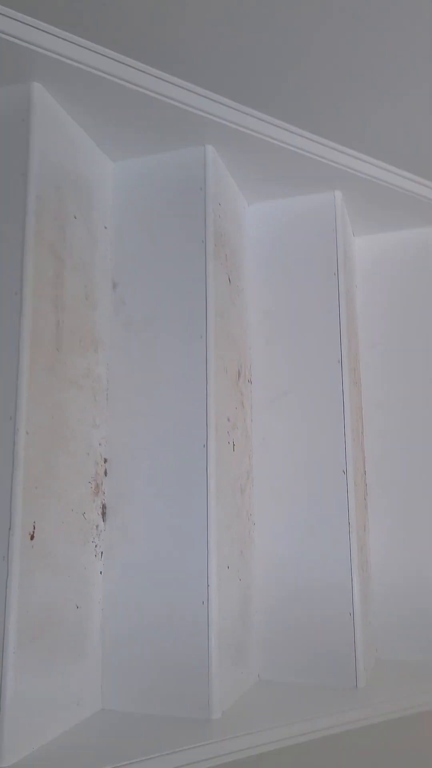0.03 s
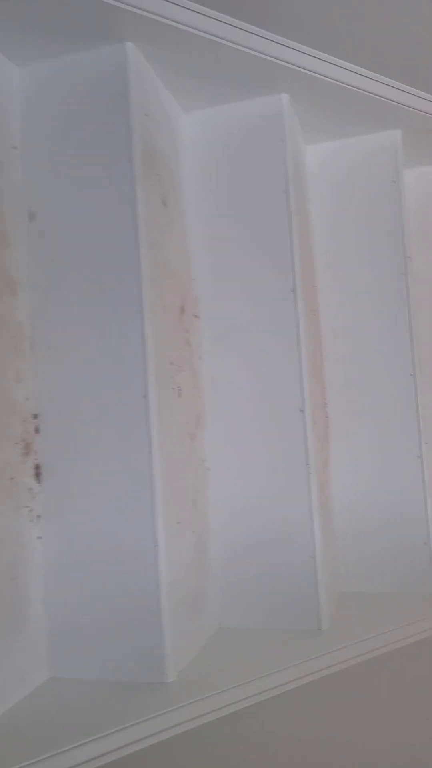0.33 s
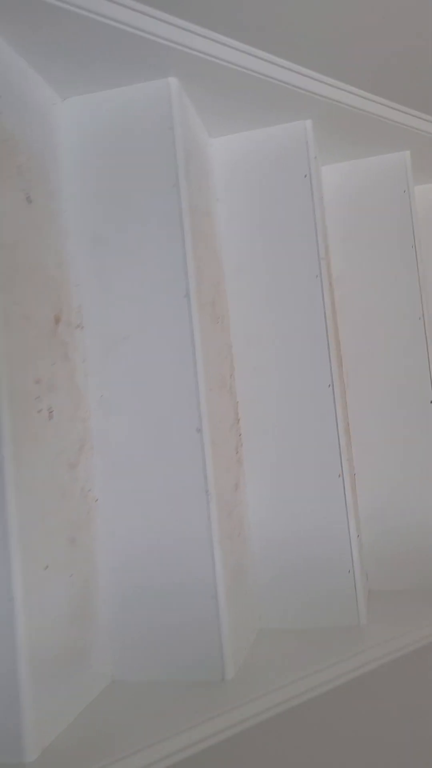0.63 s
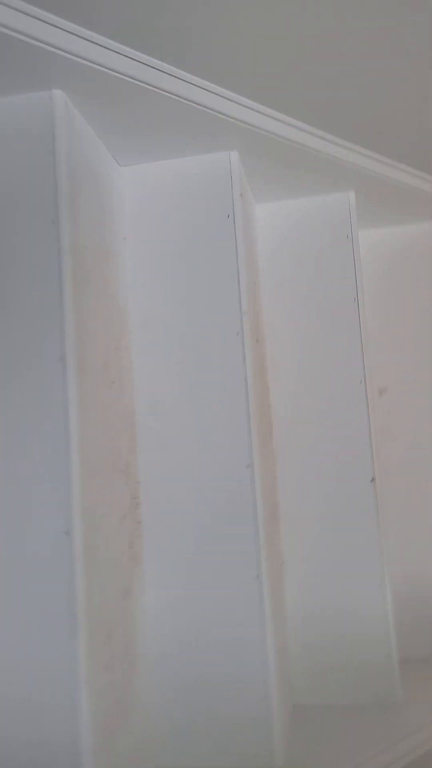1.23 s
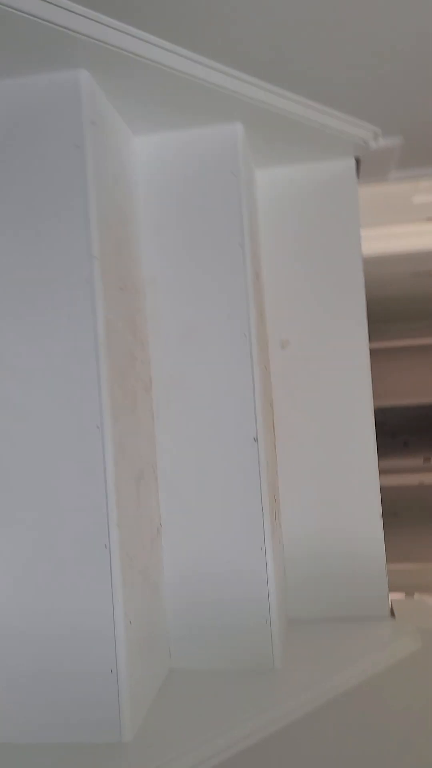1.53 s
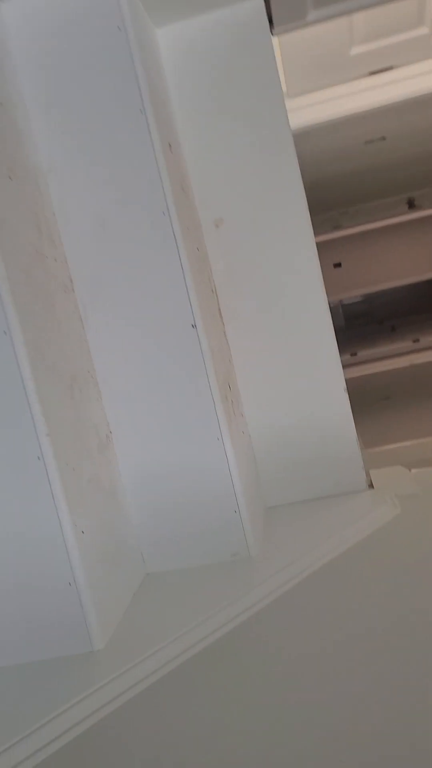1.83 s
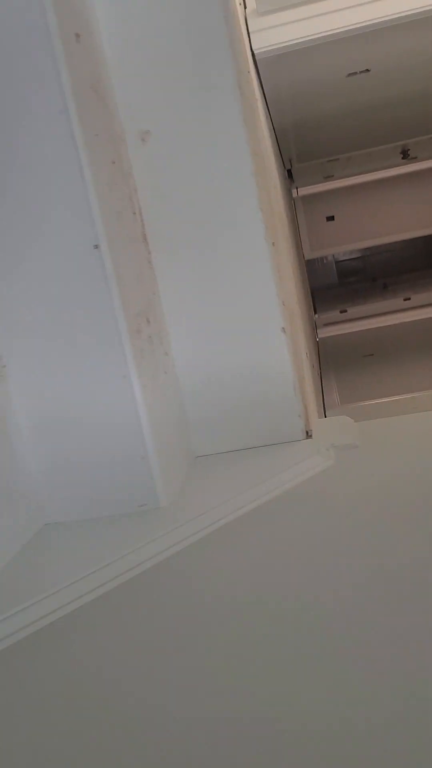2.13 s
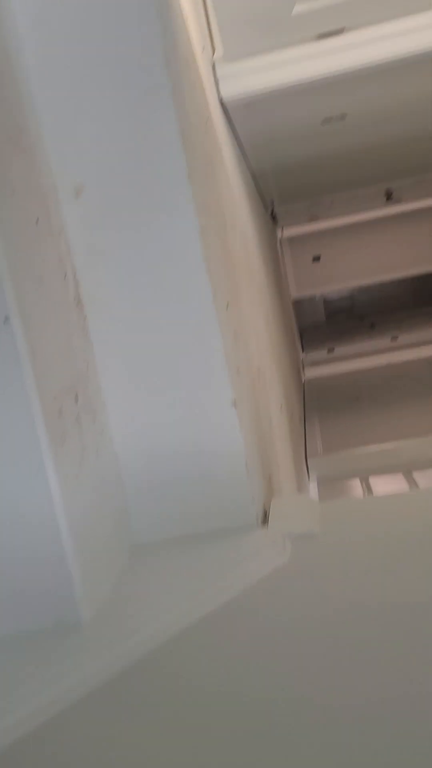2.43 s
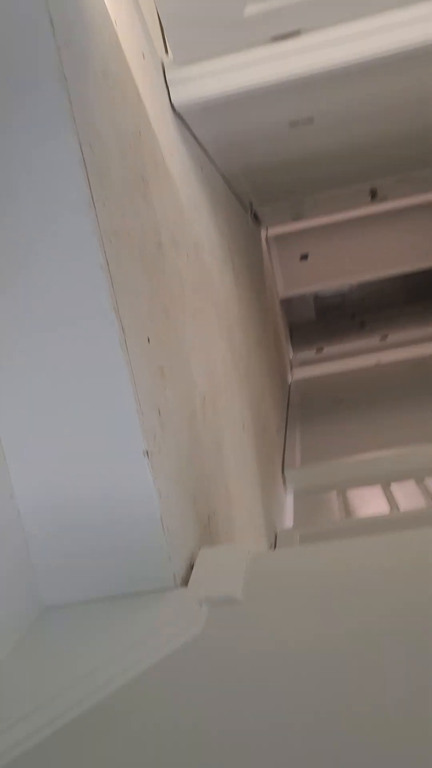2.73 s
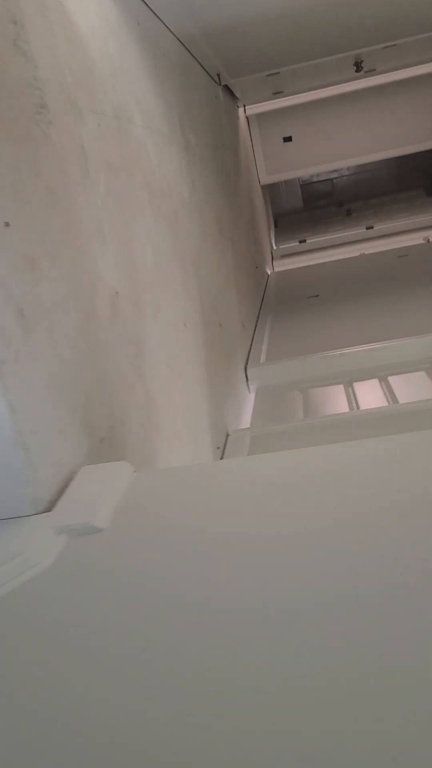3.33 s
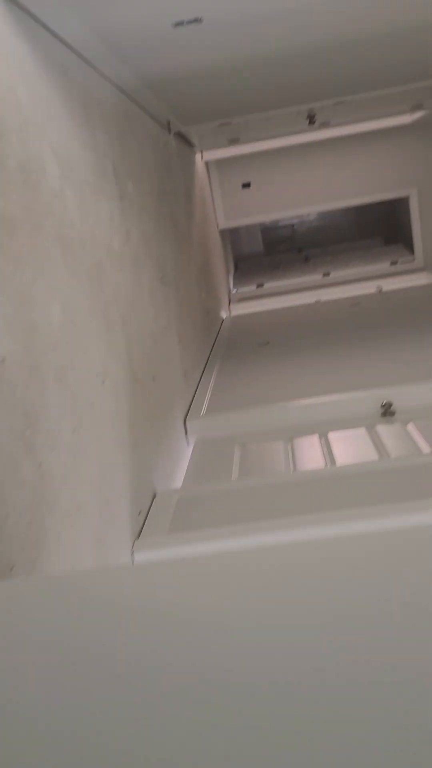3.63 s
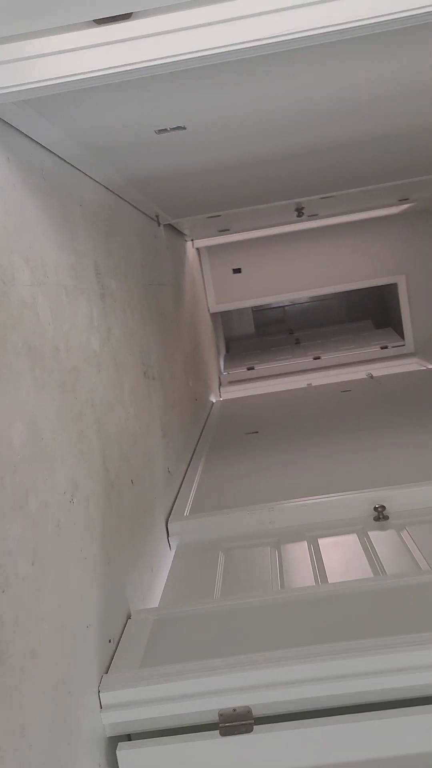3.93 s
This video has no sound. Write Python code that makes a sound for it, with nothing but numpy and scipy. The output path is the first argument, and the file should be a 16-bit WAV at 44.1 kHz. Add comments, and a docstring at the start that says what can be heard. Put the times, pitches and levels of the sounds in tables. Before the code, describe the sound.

Heard close from a phone in the walker's hand, six footsteps descend wooden stairs, starting soft and growing heavier. Light scuffs, dry ticks and a faint metal jingle fall between them, with bare walls echoing over quiet room noise.

```python
"""Footsteps going down a wooden staircase in an empty house, heard from a phone in the walker's hand.
Heel and sole strike each tread: the board thuds, the hollow flight booms, the shoe slaps and grinds on grit.
Between steps soles scuff, joints tick and a small piece of metal jingles.
The phone's two microphones hear all this close by, with bare walls ringing over quiet room noise."""
import sys
import numpy as np
from scipy import signal
from scipy.fft import rfft, irfft
from scipy.io import wavfile
from scipy.ndimage import map_coordinates

SR = 44100
rng = np.random.default_rng(int(sys.argv[2]) if len(sys.argv) > 2 else 0)


def wav_out(sig):
    """Save sig, one row per channel (or a flat mono array), as 16-bit PCM at SR to the path in sys.argv[1]."""
    wavfile.write(sys.argv[1], SR, np.round(np.clip(np.atleast_2d(sig).T, -1, 1) * 32767).astype(np.int16))


N = 176400
CONTACT_RISE_S = 0.00022


def undb(db):
    return 10 ** (np.asarray(db) / 20)


def clock():
    return np.arange(N) / SR


def bins():
    return np.arange(N // 2 + 1) * SR / N


def curve(points, hz):
    """Straight lines between points on a log-frequency axis."""
    freqs, values = np.array(points, float).T
    return np.interp(np.log(np.maximum(hz, 1)), np.log(freqs), values)


def conv(x, impulse):
    return signal.fftconvolve(x, impulse)[:N]


def colour(x, points):
    """Causal filter of the given colour that keeps the power of white noise."""
    cepstrum = irfft(np.log(undb(curve(points, bins()))))
    cepstrum[1:N // 2] *= 2  # fold to minimum phase
    cepstrum[N // 2 + 1:] = 0
    impulse = irfft(np.exp(rfft(cepstrum)))[:8192]
    return conv(x, impulse / np.linalg.norm(impulse))


def resonate(x, hz, width_hz):
    """One narrow resonance that keeps the power of white noise."""
    t = clock()[:4096]
    impulse = np.sin(2 * np.pi * hz * t) * np.exp(-np.pi * width_hz * t)
    return conv(x, impulse / np.linalg.norm(impulse))


def ring(modes, start_s, scale=1):
    """Decaying modes struck at one moment."""
    first = min(max(int(start_s * SR), 0), N - 1)
    t = np.maximum(clock() - start_s, 0)[first:first + SR, None]
    hz, db, t60 = np.array(modes, float).T
    decay = np.exp(-np.log(1000) * t / t60)
    out = np.zeros(N)
    out[first:first + SR] = (undb(db) * np.sin(2 * np.pi * hz * scale * t) * decay).sum(axis=1)
    return out


def burst(start_s, rise_s, fall_s):
    """Quick attack, exponential release."""
    t = np.maximum(clock() - start_s, 0)
    return (1 - np.exp(-t / rise_s)) * np.exp(-np.minimum(t / fall_s, 50))


def grains(spread_db):
    """Noise broken into tiny contacts of uneven size; the spread is capped at 4 dB."""
    sizes = undb(np.clip(spread_db, 0, 4) * rng.standard_normal(N // 20 + 1))
    noise = rng.standard_normal(N) * np.repeat(sizes, 20)[:N]
    return noise / noise.std()


# Stereo width of the room at the microphones: freq_hz, side_over_mid_db
ROOM_WIDTH = [(70, -2.5), (130, -16.5), (260, -4.5), (500, 0), (1000, 5.5), (2200, 1), (15000, -1)]
def spread(mid, side):
    """Left and right from two unrelated sounds; the bass is mostly shared."""
    width = undb(curve(ROOM_WIDTH, bins()))
    shared = rfft(mid) / np.hypot(1, width)
    opposed = rfft(side) * width / np.hypot(1, width)
    return irfft(np.array([shared + opposed, shared - opposed]))


# Room tone of the empty house: freq_hz, level_db
AIR_COLOUR = [(20, -16), (40, -2.5), (68, -3), (105, -16), (170, -24), (400, -18.5), (950, -26),
              (1600, -24), (3000, -31), (4600, -29.5), (7000, -34), (9000, -45), (15500, -44.5)]
def still_air():
    """Quiet, steady noise all around the microphones, mostly low rumble."""
    gain = undb(curve(AIR_COLOUR, bins()))
    mid, side = irfft(rfft(rng.standard_normal((2, N))) * gain)
    air = spread(mid, side)
    return undb(-52) * air / air.std()


# Decay of the stairwell: freq_hz, t60_s
WALL_DECAY = [(70, 0.56), (160, 0.12), (450, 1.0546), (1500, 0.35), (4500, 0.53), (9000, 0.61),
              (15000, 0.26)]
# Strength of its echo at the phone: freq_hz, level_db
WALL_COLOUR = [(60, -16.5), (150, -2), (400, -2.5), (1500, 6), (5000, 3.5), (14000, 2.5)]
def stairwell(x):
    """Dense echoes from bare walls, each octave with its own decay."""
    octaves_hz = 62.5 * 2 ** np.arange(9)
    noise = rfft(rng.standard_normal((2, N)))
    tail = np.zeros((2, N))
    for hz, weights in zip(octaves_hz, np.eye(9)):
        band = curve(list(zip(octaves_hz, weights)), bins())
        shape = burst(0.00084, rise_s=0.00043, fall_s=curve(WALL_DECAY, hz) / np.log(1000))
        tail += irfft(noise * band) * shape / np.linalg.norm(shape) * undb(curve(WALL_COLOUR, hz))
    return np.array([conv(x, impulse) for impulse in spread(*tail)])


def moving_echoes(x, change_hz=14):
    """Walker and phone keep moving, so the pattern of echoes keeps changing."""
    turn = 2 * np.pi * change_hz * clock()
    return stairwell(x * np.cos(turn)) + stairwell(x * np.sin(turn))


def squeak(peak_s=0.2235, pitch_hz=5650, width_s=0.0011):
    """One tiny high squeak close to the phone, too near to stir the room."""
    t = clock() - peak_s
    return undb(-35) * np.exp(-(t / width_s) ** 2) * np.sin(2 * np.pi * pitch_hz * t)


# Ticks on the staircase: start_s, level_db
WOOD_TICKS = [(0.335, -37), (0.883, -36), (1.248, -27.5), (2.028, -30), (2.227, -38), (3.142, -46)]
# Colour of a tick: freq_hz, level_db
TICK_COLOUR = [(300, -6), (1500, 0), (5000, -3), (8000, -8), (16000, -16)]
def ticks():
    """Wood and grit give lone dry ticks."""
    shape = sum(undb(db) * burst(start_s, rise_s=0.00054, fall_s=0.0015) for start_s, db in WOOD_TICKS)
    return colour(shape * rng.standard_normal(N), TICK_COLOUR)


# Colour of the crunch underfoot, and of the metal's first touch: freq_hz, level_db
BRIGHT_COLOUR = [(2500, -18), (4300, -1), (5100, 5), (5400, 7), (5750, -3), (6050, 7), (6500, 7),
                 (7700, -0.5), (11000, 0.5), (14000, -6), (16000, -3.5)]
def crunch(start_s=0.514, length_s=0.012):
    """A short run of bright cracks under a shoe stops and leaves a thin ring."""
    t = np.maximum(clock() - start_s, 0)
    shape = np.minimum(t / 0.001, 1) * np.exp(-np.minimum((t / length_s) ** 2, 50))
    fading_noise = burst(start_s, CONTACT_RISE_S, fall_s=0.2253) * rng.standard_normal(N)
    tail = resonate(fading_noise, hz=5350, width_hz=170)
    cracks = colour(shape * grains(spread_db=1), BRIGHT_COLOUR)
    return undb(-30) * cracks + undb(-50.5) * tail


# Jolts of the metal piece: start_s, ring_db, rattle_db
METAL_JOLTS = [(1.527, -46, -44), (2.186, -58, -68), (2.80, -65, -59), (3.33, -63, -49.5),
               (3.375, -76, -52)]
# Its modes: pitch_hz, level_db, t60_s
METAL_MODES = [(13494, -2, 0.22), (13551, 0, 0.3), (13630, -1, 0.16)]
def jingles():
    """A small metal piece, jogged by the walk, clinks once, rattles briefly and rings on."""
    pings, rattle = np.zeros((2, N))
    for start_s, ring_db, rattle_db in METAL_JOLTS:
        pings += undb(ring_db) * ring(METAL_MODES, start_s)
        rattle += undb(rattle_db) * burst(start_s, rise_s=0.0028, fall_s=0.023)
    first_touch = burst(1.511, CONTACT_RISE_S, fall_s=0.002) * rng.standard_normal(N)
    clink = undb(-31.5) * colour(first_touch, BRIGHT_COLOUR)
    return pings + clink + resonate(rattle * grains(spread_db=2), hz=11000, width_hz=1000)


# Soles sliding and lifting below the phone: peak_s, rise_s, fall_s, rub_db, hiss_db
SLIDES = [(0.005, 0.026, 0.022, -44.5, -51.5), (0.074, 0.029, 0.018, -55, -50),
          (0.62, 0.16, 0.13, -51, -62), (1.413, 0.1, 0.093, -49.5, -55.5), (1.94, 0.021, 0.035, -45.5, -72),
          (2.10, 0.16, 0.055, -47.5, -55), (2.762, 0.082, 0.052, -48.5, -54),
          (3.44, 0.14, 0.06, -52.5, -57.5)]
# Colours of the rub and of the hiss: freq_hz, level_db
RUB_COLOUR = [(80, -2), (250, 4), (480, 7.5), (900, -2), (1450, 3.5), (2500, -4), (4500, -4), (7000, -29),
              (8500, -28), (16000, -35)]
HISS_COLOUR = [(1500, -8), (4000, -8), (6500, 5), (8500, -1.5), (16000, -4)]
def scuffs():
    """A sole slides over dusty paint, swelling and dying away."""
    rub, hiss = np.zeros((2, N))
    for peak_s, rise_s, fall_s, rub_db, hiss_db in SLIDES:
        t = clock() - peak_s
        fade = np.where(t < 0, (t / rise_s) ** 2, t / fall_s)
        shape = np.exp(-np.minimum(fade, 50))
        rub += undb(rub_db) * shape
        hiss += undb(hiss_db) * shape
    return (colour(rub * grains(spread_db=4), RUB_COLOUR)
            + colour(hiss * grains(spread_db=4), HISS_COLOUR))


# Modes of a thin loose board: pitch_hz, level_db, t60_s
BOARD_MODES = [(1530, -2, 0.16), (1600, -10, 0.18), (3380, -8, 0.16)]
def loose_board():
    """The last step makes a thin board ring."""
    return undb(-34.5) * ring(BOARD_MODES, start_s=3.891)


# Shoe edges coming down on the treads: peak_s, level_db, centre_hz
EDGE_HITS = [(0.411, -32.5, 4260), (1.195, -37, 3100), (1.268, -42.5, 2930), (1.88, -28, 1850),
             (1.893, -29.5, 6230), (2.561, -37.5, 4300), (2.578, -36, 4300), (3.217, -36.5, 2900),
             (3.88, -32, 1600), (3.894, -33.5, 5100)]
# Colour of one clack: centre_ratio, level_db
EDGE_COLOUR = [(0.2, -11), (0.6, -4.5), (1.0, 1.5), (1.4, -9), (2.5, -24), (5, -27)]
def clacks(width_s=0.0022):
    """The hard edge of a shoe claps onto the paint for a few milliseconds."""
    out = np.zeros(N)
    for peak_s, db, centre_hz in EDGE_HITS:
        shape = np.exp(-np.minimum(((clock() - peak_s) / width_s) ** 2, 50))
        points = [(centre_hz * ratio, level_db) for ratio, level_db in EDGE_COLOUR]
        out += undb(db) * colour(shape * grains(spread_db=1), points)
    return out


def soften(x, push_s, low_cut_hz=77.6):
    """A rubber sole spreads a blow over milliseconds; the thud is heard with its deepest bass cut away."""
    t = clock()[:2048]
    push = t * np.exp(-4 * t / push_s)
    low_cut = signal.butter(3, low_cut_hz, "high", fs=SR, output="sos")
    return signal.sosfilt(low_cut, conv(x, push / push.sum()))


# Steps on the stairs, just below the microphones:
# start_s, pitch_hz, thud_db, boom_db, knock_db, slap_db, grit_db, sole_lag_s, sole_over_heel_db, push_s
FOOTFALLS = [(0.401, 174, -30, -45, -38, -40.5, -52, 0.0098, 8, 0.0032),
             (1.178, 157.6, -22, -49, -43, -41.5, -48.5, 0.019, 5.5, 0.0043),
             (1.880, 150.6, -11, -51, -17.5, -30.5, -53, 0.00687, -5, 0.0024),
             (2.541, 140, -14, -20.5, -28, -31.5, -46.5, 0.024, -2.5, 0.0019),
             (3.206, 168.8, -11.5, -20, -37, -40, -54, 0.01158, 3, 0.0041),
             (3.879, 184.5, -12.5, -47, -27.5, -33, -53, 0.012, -1, 0.0029)]
# Weight rolling onto the toes: start_s, thud_db, knock_db
TOE_ROLLS = [(0.429, -30, -56), (1.25, -32, -41), (1.911, -21.5, -16.5), (2.754, -38.5, -54),
             (3.225, -33, -37.5), (3.433, -37, -41.5), (3.905, -21.5, -23.5), (3.945, -27, -44)]
# Modes of the tread underfoot: pitch_ratio, level_db, t60_s
TREAD_MODES = [(0.76, -12.5, 0.1), (1.0, 1.5, 0.098), (1.24, -5, 0.11), (1.66, -6.5, 0.06),
               (2.15, -17.5, 0.046)]
# Modes of the hollow flight, and of its risers and joints: pitch_hz, level_db, t60_s
FLIGHT_MODES = [(60.6, -12, 1), (77.5, 2, 0.32), (91.5, 6, 0.069), (118.6, -5, 0.38)]
RISER_MODES = [(199.8, 7.5, 0.53), (240, -18, 0.25), (284.3, -0.5, 0.38), (343, 7, 0.1), (447, -10, 0.7),
               (616, -10, 0.21)]
# Colours of the wood's knock, the shoe's slap and the grit between them: freq_hz, level_db
KNOCK_COLOUR = [(100, -24.5), (220, 2), (320, -0.5), (460, -5.5), (650, -9.5), (900, -23.5), (2000, -52)]
SLAP_COLOUR = [(200, -22), (600, -1.5), (950, -8.5), (1350, 0), (2200, -10.5), (3600, -12.5), (6000, -19),
               (9000, -29.5), (16000, -53)]
GRIT_COLOUR = [(1000, -18), (3500, -11), (5800, -13), (7200, 8), (8500, -12), (11500, -1), (16000, -31)]
def footsteps(give_lag_s=0.0017, knock_fall_s=0.017, toe_pitch_hz=140):
    """Heel, then sole: each slaps and grinds, the wood gives way and rings; weight rolls onto the toes."""
    wood, knock, slap, grit, toes = np.zeros((5, N))
    for start_s, hz, thud_db, boom_db, knock_db, slap_db, grit_db, lag_s, sole_db, push_s in FOOTFALLS:
        blow = np.zeros(N)
        for touch_s, force in ((start_s, 1), (start_s + lag_s, undb(sole_db))):
            give_s = touch_s + give_lag_s
            thud = undb(thud_db) * ring(TREAD_MODES, give_s, scale=hz)
            boom = undb(boom_db) * ring(FLIGHT_MODES, give_s)
            risers = undb(knock_db - 14.5) * ring(RISER_MODES, give_s)
            blow += force * (thud + boom + risers)
            knock += force * undb(knock_db) * burst(give_s, CONTACT_RISE_S, knock_fall_s)
            slap += force * undb(slap_db) * burst(touch_s, CONTACT_RISE_S, fall_s=0.012)
            grit += force * undb(grit_db) * burst(touch_s, rise_s=0.0021, fall_s=0.0081)
        wood += soften(blow, push_s)
    for start_s, thud_db, knock_db in TOE_ROLLS:
        thud = ring(TREAD_MODES, start_s, scale=toe_pitch_hz)
        boom = undb(-1.5) * ring(FLIGHT_MODES, start_s)
        toes += undb(thud_db) * (thud + boom)
        knock += undb(knock_db) * burst(start_s, CONTACT_RISE_S, knock_fall_s)
    return (wood + soften(toes, push_s=0.0034)
            + colour(knock * grains(spread_db=1), KNOCK_COLOUR)
            + colour(slap * grains(spread_db=4.5), SLAP_COLOUR)
            + colour(grit * grains(spread_db=0), GRIT_COLOUR))


def scene(right_lag_s=0.000356, small_echo_gain=0.54):
    """Direct sound reaches the left microphone first; the walls answer over still air."""
    feet = footsteps() + scuffs() + loose_board()
    small_sounds = ticks() + clacks() + jingles() + crunch()
    left = feet + small_sounds + squeak()
    right = map_coordinates(left, [np.arange(N) - right_lag_s * SR], order=3)
    return np.array([left, right]) + still_air() + moving_echoes(feet + small_echo_gain * small_sounds)


# Balance of the phone's two microphones: freq_hz, left_minus_right_db
MIC_BALANCE = [(100, 0.9), (270, -1.5), (1000, -0.2), (2000, 0), (4000, -7), (6500, -5), (9000, -2)]
def record(dry, top_hz=15900):
    """The right microphone is brighter in the presence range; the top is cut on both."""
    tilt_db = curve(MIC_BALANCE, bins()) / 2
    gain = undb(np.repeat([tilt_db, -tilt_db], 2, axis=1)[:, :N + 1])  # on the bins of a padded FFT
    heard = irfft(rfft(dry, 2 * N) * gain)[:, :N]
    high_cut = signal.ellip(10, .2, 80, top_hz, fs=SR, output="sos")
    return signal.sosfilt(high_cut, heard)


dry = scene()
out = record(dry)
wav_out(out)
```